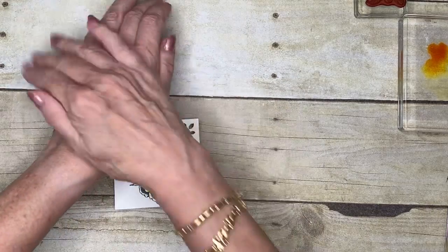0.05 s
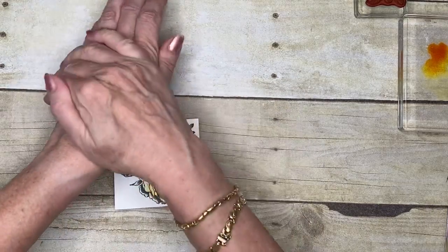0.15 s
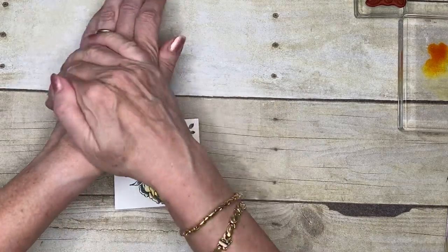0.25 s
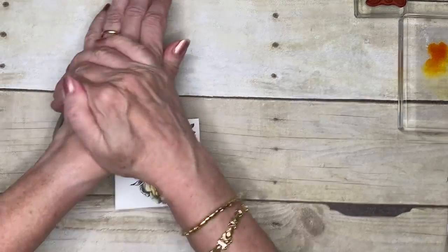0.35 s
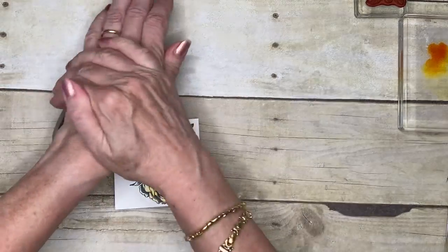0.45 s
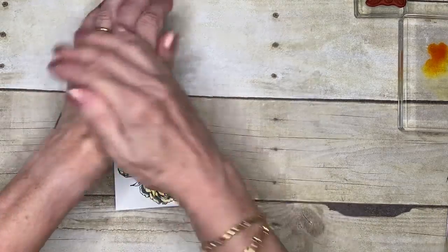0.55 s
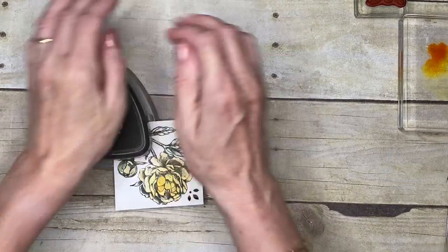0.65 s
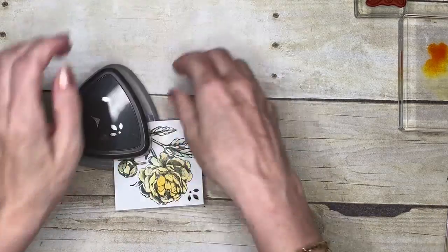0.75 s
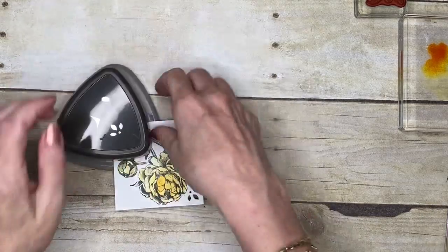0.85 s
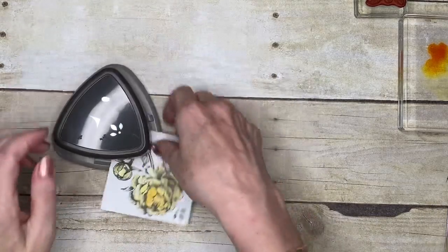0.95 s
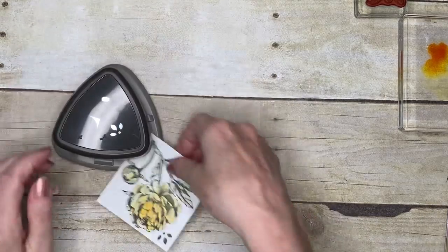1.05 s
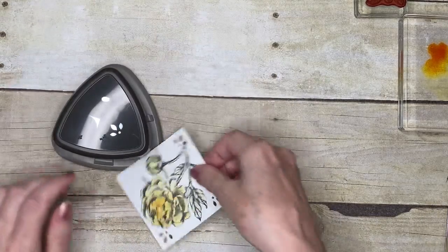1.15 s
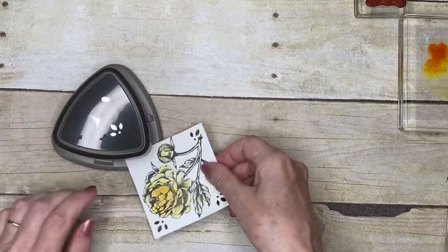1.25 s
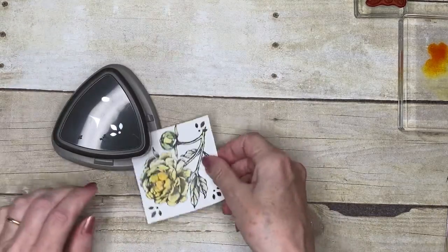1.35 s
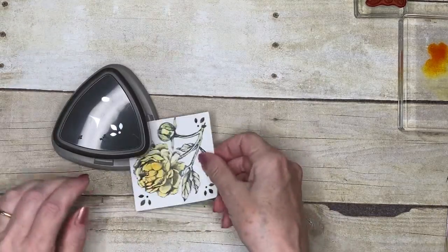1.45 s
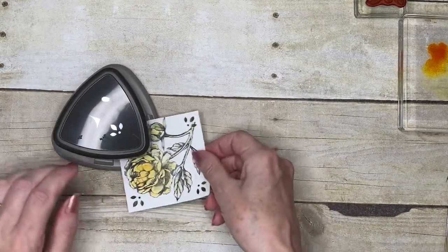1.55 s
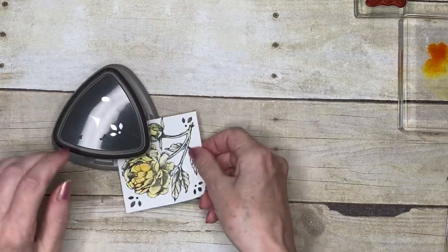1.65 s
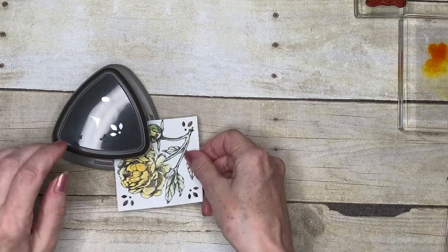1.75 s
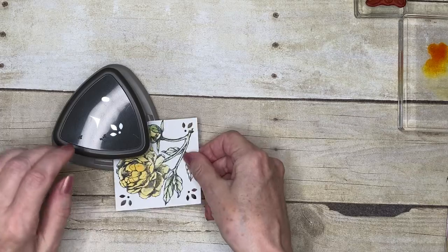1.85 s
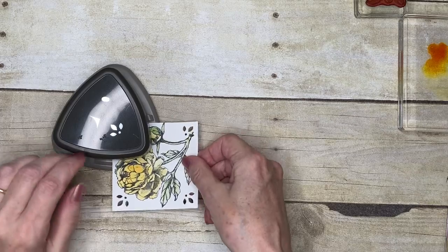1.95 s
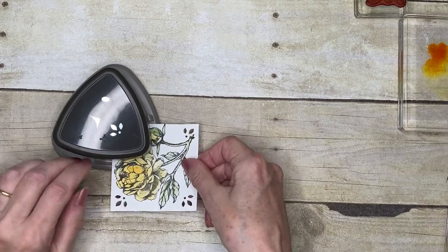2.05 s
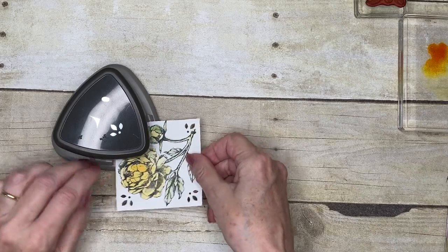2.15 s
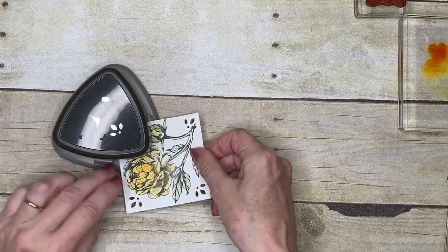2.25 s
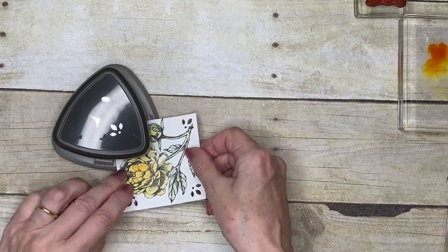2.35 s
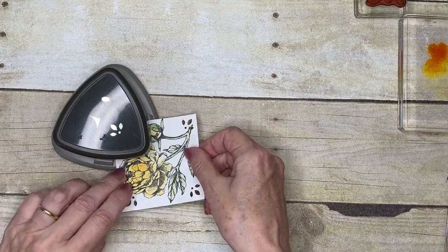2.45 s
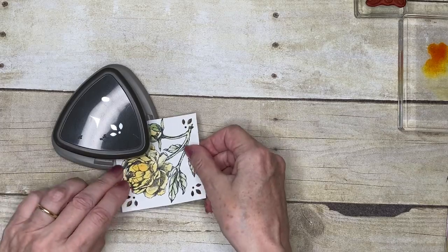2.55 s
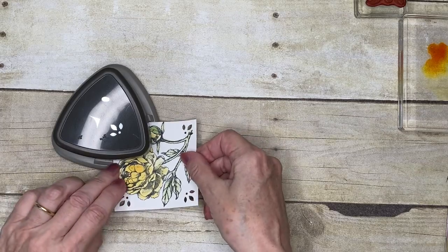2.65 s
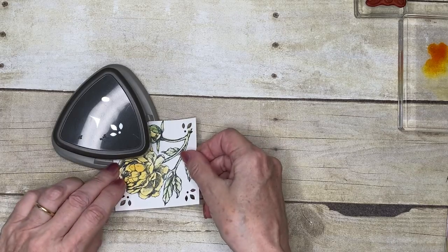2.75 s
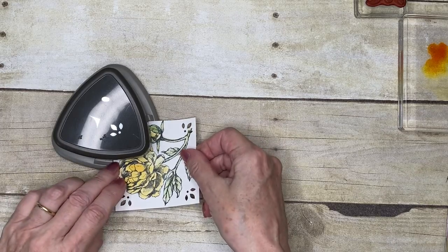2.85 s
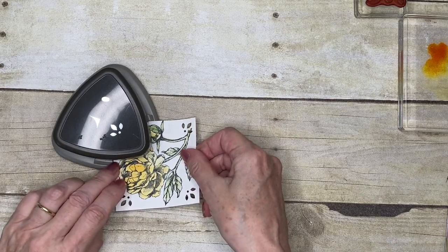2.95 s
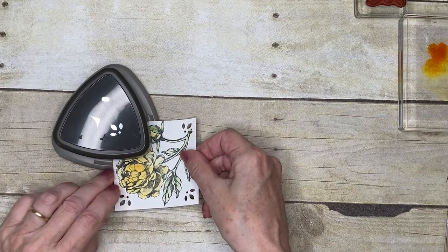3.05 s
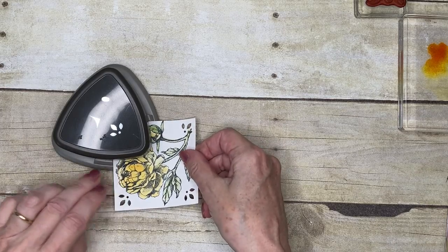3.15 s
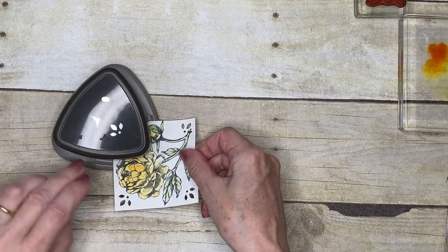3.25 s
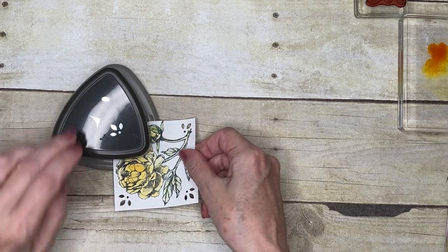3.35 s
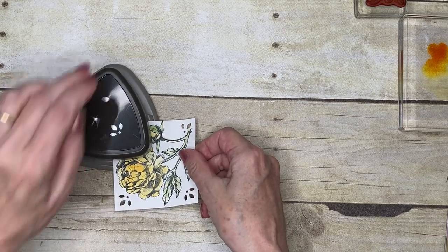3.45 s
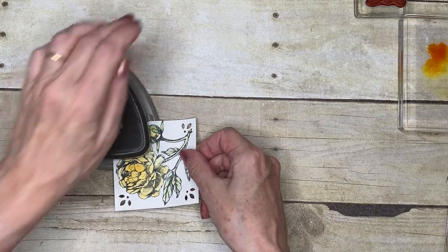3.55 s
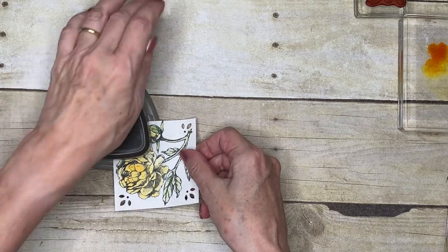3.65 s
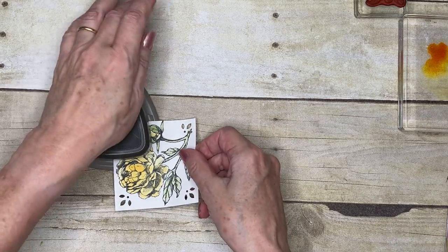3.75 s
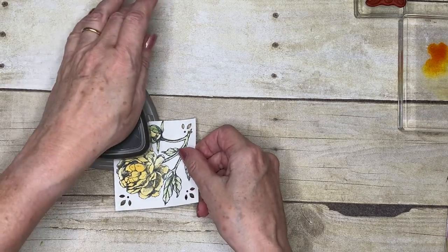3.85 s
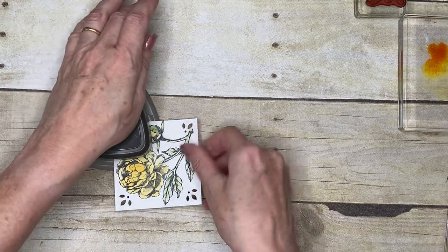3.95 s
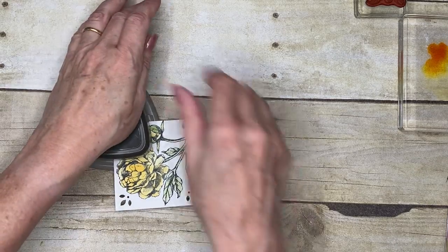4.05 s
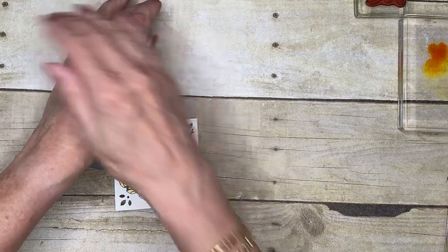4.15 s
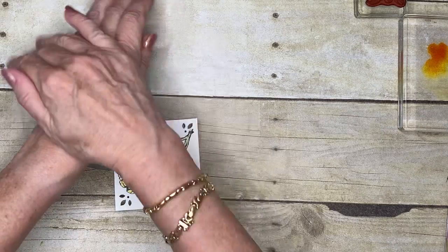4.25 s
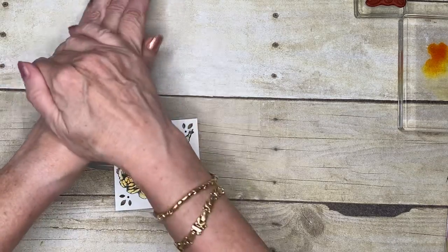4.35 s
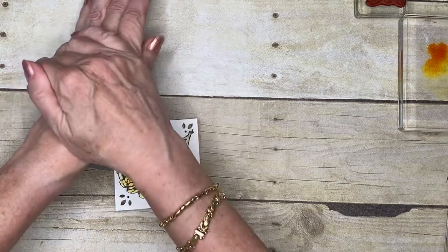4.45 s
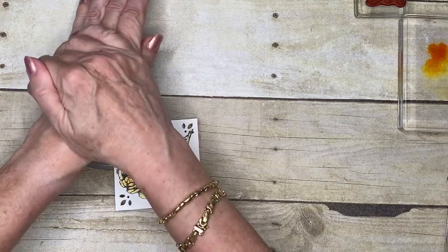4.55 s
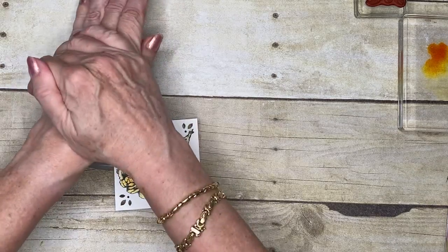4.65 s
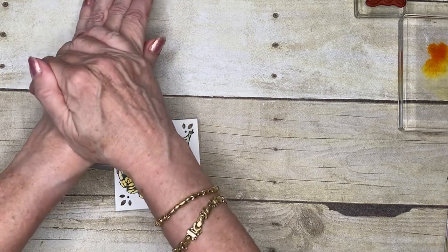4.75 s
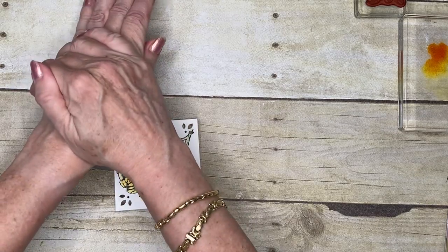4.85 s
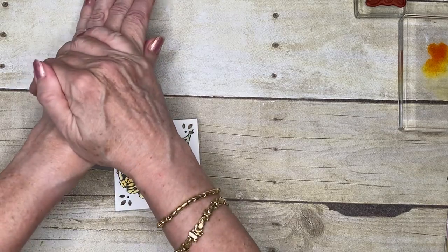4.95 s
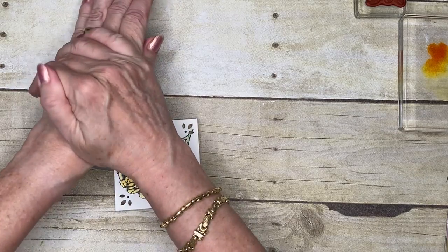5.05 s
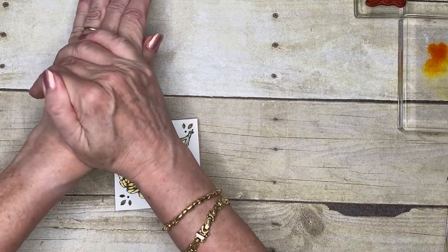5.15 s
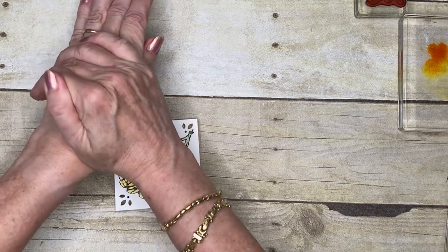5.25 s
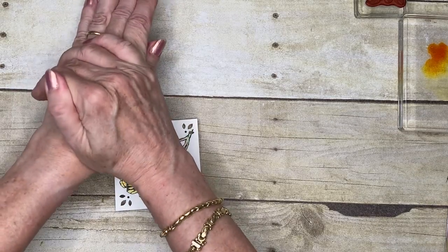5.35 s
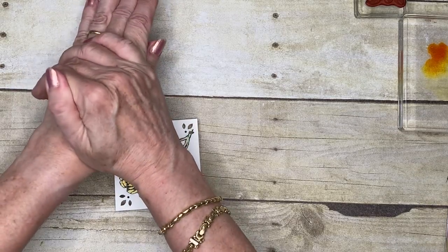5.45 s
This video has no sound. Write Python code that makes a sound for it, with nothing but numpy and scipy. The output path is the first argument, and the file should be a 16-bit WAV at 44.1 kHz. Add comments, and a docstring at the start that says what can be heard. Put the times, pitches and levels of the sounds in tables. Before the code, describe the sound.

A phone just above the table hears a hard, hollow plastic snap at the start, with a short wooden boom, then a scuff and softer springback click with a very faint metallic ring. Quiet papery shuffles and little taps follow, thinning to near silence over low room rumble. Late on, a dull hand touch and one medium plastic click, then faint rubbing; no second loud snap.

```python
"""On a wooden craft table in a small quiet room, a plastic corner punch cuts a card, heard by a phone above.
Palms lean on the lid until the die snaps through, the lid springs back, the card is slid out, turned and
nudged into the slot again, and a hand settles on the lid. Contacts ring damped modes of shell and slot lip,
pushes boom in the table top, two spring modes beat, and filtered friction noise makes the strokes.
Decaying noise tails form the room's answer, over a low building rumble with faint hiss."""
import sys
import numpy as np
from scipy import signal
from scipy.fft import rfft, irfft, next_fast_len
from scipy.io import wavfile
from scipy.ndimage import uniform_filter1d, map_coordinates

SR = 44100
rng = np.random.default_rng(int(sys.argv[2]) if len(sys.argv) > 2 else 0)


def master_out(mix):
    """Clip the mix to full scale and print it as 16-bit PCM to the path in sys.argv[1]."""
    frames = np.transpose(np.atleast_2d(mix))
    ceiling = np.clip(frames, -1, 1)
    pcm = np.round(ceiling * 32767).astype(np.int16)
    wavfile.write(sys.argv[1], SR, pcm)


N = 242550  # 5.5 s


# Contacts on the punch: start_s, shell_db, edge_re_shell_db, crack_re_shell_db (before fixed trims),
# favoured_shell_hz, favoured_edge_hz
CONTACTS = [(0.016, -55.5, -3, -11, 1370, 2000), (0.109, -34.5, -8, -11, 1400, 2730),
            (0.294, -23, -9, -18, 1500, 2560), (.2995, -3, -5.5, -16.5, 1538, 2770),
            (.302, -6, -12, -7, 1362, 2800), (.306, -5, -23, -3.5, 1150, 2090),
            (.309, -26, 8, -4, 757.8, 2100), (.54, -11, -12, -10.5, 920, 2230),
            (.5445, -15.5, -8, -9.5, 1030, 2220), (.55, -30.5, 7, -30, 1090, 3200),
            (0.732, -57.5, -11.5, -1.5, 910, 2350), (0.853, -35.5, -19.5, -10, 1400, 1895),
            (0.913, -31.5, -16.5, -25, 1040, 2180), (0.955, -49.5, 7.5, -2, 637, 2870),
            (1.027, -49.5, 13, -4, 1045, 2450), (1.145, -55, 5.5, 7, 1140, 2300),
            (1.191, -32.5, 7, -23, 1276, 2500), (1.244, -50, -10, -30.5, 933, 2280),
            (1.425, -59.5, 14, -14, 1590, 1860), (1.463, -48, 2.5, -18.5, 1144, 1910),
            (1.49, -41, 3.5, -35, 1228, 1820), (1.594, -50.5, -6.5, -27.5, 930, 2650),
            (1.737, -54.5, 7.5, -6.5, 1060, 2654), (1.893, -40, 0, -5, 1230, 2500),
            (2.171, -49, 9.5, -3.5, 1063, 2940), (2.301, -39, -0.5, -40, 1260, 2500),
            (2.635, -30, -0.5, -6, 1224, 2670), (2.762, -49, 10.5, -29, 1000, 2316),
            (3.368, -47, -17, -35, 618, 3140), (3.681, -61, -8.5, -16.5, 688, 2630),
            (3.739, -56.5, -16, -20, 655, 2240), (3.796, -46, 4, -11.5, 1196, 2300),
            (3.839, -28.5, -20.5, -17, 690, 2690), (3.946, -41.5, 0.5, -15.5, 1530, 2770),
            (4.222, -62.5, 0, -17, 1500, 2000), (4.243, -49, -21, -35.5, 694, 1900),
            (4.3015, -15.5, -13.5, -13, 1110, 1760), (4.487, -65.5, -8.5, 8, 552, 2777),
            (4.755, -52, -1, 12, 972, 2300), (4.9, -52, -1.5, -17.5, 1530, 1707)]
# Modes of the plastic shell, before random detuning and spread: pitch_hz, level_db, t60_s
SHELL_MODES = [(543, -4, 0.029), (760, 0.5, 0.021), (890, -1, 0.019), (1021, 1.5, 0.01), (1146, 4, 0.02),
               (1234, -1, .025), (1304, -1, 0.019), (1508, -0.5, .022), (1630, -10.5, 0.025)]
# Modes of the thin lip of the slot, likewise: pitch_hz, level_db, t60_s
EDGE_MODES = [(1880, -1, .018), (2050, -2, .018), (2280, 0, .018), (2550, 0, .016), (2810, 0, .014),
              (3200, -2, .012), (4000, -5, .01), (5000, -6, .008)]
# Relative spectrum of the crack: frequency_hz, density_db (per Hz)
CRACK_SPECTRUM = [(300, -2), (1000, -1.5), (3000, 0.5), (5500, -2), (8000, -0.5), (11000, 2), (15000, -7.5)]


def clicks():
    """Modal excitation: a contact rings shell and lip, most near its spot's favoured pitches, with a brief crack."""
    out, t = np.zeros(N), np.arange(SR // 16) / SR
    noise = rng.standard_normal((len(CONTACTS), len(t)))
    cracks = unit(filtered(noise, lambda hz: amp(along(CRACK_SPECTRUM, hz))))
    cracks *= amp(-60 * t / 0.019) * (1 - np.exp(-t / 0.0022))
    for (s, db, edge_db, crack_db, shell_hz, edge_hz), crack in zip(CONTACTS, cracks):
        # level falls by so many dB per octave away from the favoured pitch
        modes = [(hz, level + 0.5 - 10.5 * abs(np.log2(hz / shell_hz)), t60)
                 for hz, level, t60 in SHELL_MODES]
        modes += [(hz, level + edge_db + 2.5 - 15 * abs(np.log2(hz / edge_hz)), t60)
                  for hz, level, t60 in EDGE_MODES]
        body = np.zeros(len(t))
        for hz, level, t60 in modes:
            detune, spread = rng.standard_normal(2)
            body += ring(hz * (1 + 0.03 * detune), level + 2.9 * spread, t60, t, attack=.0017)
        add(out, s, amp(db) * (body + amp(crack_db + 4.5) * crack))
    return out


# Pushes into the table top: start_s, first_mode_db, second_mode_db, third_mode_db, planks_db
TABLE_PUSHES = [(0.069, -32.5, -36, -58, -50), (0.115, -42, -36, -32, -39), (0.3081, -10.5, 0, -9.5, -5),
                (.518, -34, -37, -17, -26.5), (0.549, -30.5, -21.5, -41.5, -27.5),
                (.86, -64.5, -68.5, -45.5, -54), (.915, -50.5, -75.5, -46.5, -48),
                (1.247, -49.5, -75, -62.5, -51), (3.801, -56.5, -37, -36, -42),
                (3.843, -30.5, -23.5, -23, -35.5), (3.94, -39.5, -49, -54, -49),
                (4.266, -36.5, -54, -50, -57), (4.307, -35, -25, -20, -26), (4.796, -57.5, -51, -43.5, -35)]
# Lowest modes of the table top: pitch_hz, t60_s
TABLE_MODES = [(57, 0.39), (124, 0.062), (173, 0.095)]
# Higher modes of the table top: pitch_hz, level_db, t60_s
PLANK_MODES = [(203, -5, 0.045), (289, -13, 0.11), (350.7, -15, 0.091), (413, -17, .06), (540, -5.5, 0.023)]
# Relative spectrum of the loose planks' shudder: frequency_hz, density_db (per Hz)
SHUDDER_SPECTRUM = [(60, -32.5), (150, -3.5), (250, 3), (500, -3.5), (900, -13), (2000, -33)]


def table():
    """Plate modes: each push starts the low boom, the higher modes and a noisy shudder, all decaying freely."""
    out, t = np.zeros(N), np.arange(SR // 2) / SR
    noise = rng.standard_normal((len(TABLE_PUSHES), len(t)))
    shudders = unit(filtered(noise, lambda hz: amp(along(SHUDDER_SPECTRUM, hz))))
    shudders *= amp(-10.5 - 60 * t / 0.099) * (1 - np.exp(-t / 0.0027))
    for (s, *levels, planks_db), shudder in zip(TABLE_PUSHES, shudders):
        boom = sum(ring(hz, db, t60, t, attack=0.0032) for (hz, t60), db in zip(TABLE_MODES, levels))
        planks = sum(ring(hz, db, t60, t, attack=0.00067) for hz, db, t60 in PLANK_MODES)
        add(out, s, boom + amp(planks_db) * (planks + shudder))
    return out


# Strokes of card and skin: start_s, length_s, card_db, shell_db, skin_hiss_db (before brightness and favour),
# swell_db (start to end), brightness_db (per octave), favoured_hz
RUBS = [(0.024, 0.037, -78, -68, -93, -1.5, -4, 700), (0.056, 0.054, -72, -68, -69.5, -1, 7, 1200),
        (0.13, 0.037, -82, -83, -78, -7, .1, 1300), (0.181, 0.0091, -79, -82, -66, 0, -1, 1200),
        (0.222, 0.053, -81.5, -90.5, -81, 3, -1, 1600), (0.271, 0.038, -66.5, -51.5, -80, 2, 24.5, 1500),
        (0.489, 0.073, -49.5, -47, -56.5, 9, 6.5, 750), (0.725, 0.039, -78.5, -68, -67, -10, 1.5, 1000),
        (0.851, 0.056, -66, -56.5, -64, -4, 8, 1350), (0.916, 0.03, -62.5, -54.5, -66.5, -8.5, 1, 1010),
        (0.945, 0.089, -70, -70.5, -66, 4.5, 7.5, 2910), (1.03, 0.12, -62, -67, -65.5, -1.5, -2.5, 2400),
        (1.14, 0.062, -71.5, -71, -66.5, 4, -2, 2585), (1.194, .022, -60.5, -75, -69, -14, 2, 2500),
        (1.222, 0.048, -71, -64, -73.5, -11, -0.5, 2060), (1.291, .11, -69, -76, -68, -0.5, 0, 1950),
        (1.393, .088, -64, -71, -70.5, 2, -4, 1900), (1.486, 0.061, -76.5, -68, -77.5, -5.5, 3, 996),
        (1.546, 0.09, -71, -67, -74.5, 0, 2, 2740), (1.637, 0.1, -70, -72, -81, 1, 4, 2900),
        (1.739, 0.042, -66, -67.5, -66, -7, 1, 2595), (2, .1, -86.5, -82, -91.5, 1.5, 3, 1550),
        (2.114, .035, -83, -75.5, -79.5, -5, 1, 1300), (2.156, 0.056, -72, -69, -79.5, -6.5, 0.8, 1009),
        (2.213, 0.086, -79, -79, -92.5, -2, .1, 2800), (2.315, .09, -79, -74, -92, -7, 0.2, 2800),
        (2.484, 0.061, -70, -80, -82.5, 0.5, 1, 2900), (2.58, 0.055, -66.5, -67.5, -72.5, 8.5, -1, 2005),
        (2.65, 0.044, -78, -68, -76, -14, 0.2, 1197), (2.763, 0.045, -72.5, -89.5, -92.5, -15.5, 3.1, 2705),
        (2.988, .04, -82, -78.5, -86, 1, 0.5, 1503), (3.663, 0.044, -70, -70.5, -79, -4.5, 6, 750),
        (3.757, 0.048, -72, -60, -79, 4, -6, 795), (3.803, 0.03, -59.5, -56, -65, 6.5, 4, 3010),
        (3.868, .025, -79, -84, -82.5, -7, -2, 3000), (3.903, 0.036, -67, -69.5, -70, 3, 2.5, 1980),
        (3.944, 0.053, -57, -60, -58, -3.5, 2, 1600), (4.258, 0.047, -83.5, -67.5, -79.5, 10, 9, 1507),
        (4.396, 0.082, -75, -71.5, -86, -5.5, 3.5, 3600), (4.494, 0.094, -83.5, -80.5, -88.5, 0, 5, 2000),
        (4.587, 0.17, -73.5, -71, -83, 0.5, 3.5, 3613), (4.759, 0.083, -62, -64, -63.5, -11.5, 6, 1100),
        (4.831, 0.06, -68.5, -70, -66.5, -6.5, 6.5, 3130),
        (5.125, .04, -88.5, -90.5, -80.5, 0.5, 0.7, 2000), (5.17, .03, -94.5, -76.5, -93, -4, -2.5, 700),
        (5.36, 0.094, -76, -76, -90.5, 2, -0.2, 2100)]
# Resonances of the card, passed twice: centre_hz, width_hz, level_db (each pass)
CARD_RESONANCES = [(1881, 400, -2.5), (2650, 600, 0), (3200, 690, -1.5), (4500, 1500, -7)]
# Resonances of the air under the lid, passed twice: centre_hz, width_hz, level_db (each pass)
HOLLOW_RESONANCES = [(624, 530, -5.5), (993, 232.6, 0.5), (1297, 130, 3), (1377, 470, -2)]
# Relative spectrum of the skin's hiss: frequency_hz, density_db (per Hz)
HISS_SPECTRUM = [(1500, -29), (3500, -11), (5500, -9), (8000, 1), (11000, -0.5), (15000, -13.5)]
# Pivots about which brightness tips card, shell and skin hiss: centre_hz
PIVOTS_HZ = [2500, 1100, 8000]
GRIP_S, EASE_IN, LET_GO_S = .008, .4, .02  # shortest rise; rise over length if it swells; time to die by 20 dB
FAVOUR_DB, FAVOUR_OCTAVES = 6.5, .15  # lift and width of the band that a stroke's spot favours


def sliding():
    """Stick-slip friction: uneven noise with clumps of tiny catches excites card, hollow lid and skin."""
    out, t = np.zeros(N), np.arange(SR // 3) / SR
    catches = (rng.random((3, N)) < 900 / SR) * amp(4 * rng.standard_normal((3, N)))  # about 900 a second
    own_grip = np.array([wobble(70) for _ in range(3)])
    grip = amp(2.1 * wobble(45) + 4.0 * own_grip)  # shared and separate unevenness of the contact
    friction = grip * rng.standard_normal((3, N)) * (1 + 0.3 * unit(catches))
    colours = [resonances(CARD_RESONANCES), resonances(HOLLOW_RESONANCES),
               lambda hz: amp(along(HISS_SPECTRUM, hz))]
    layers = np.array([unit(filtered(x, colour)) for x, colour in zip(friction, colours)])

    def octaves(hz):
        return np.clip(np.log2((hz + 1) / np.c_[PIVOTS_HZ]), -1, 1)

    for s, length, *levels, swell_db, bright_db, spot_hz in RUBS:
        rise = max(GRIP_S, EASE_IN * length * (swell_db > 0))
        swell = swell_db * (np.minimum(t / length, 1) - .5)
        release = -20 * np.maximum(t - length, 0) / LET_GO_S
        shape = np.minimum(t / rise, 1) * amp(swell + release)

        def tint(hz):
            distance = np.log2((hz + 1) / spot_hz) / FAVOUR_OCTAVES
            return amp(bright_db * octaves(hz) + FAVOUR_DB * np.exp(-distance ** 2))

        piece = layers[:, round(s * SR):][:, :len(t)]
        rub = amp(levels) @ filtered(piece, tint)
        add(out, s, rub * shape[:len(rub)])
    return out


# Modes of the return spring: pitch_hz, level_db, t60_s
SPRING_MODES = [(935, -59, 1.3), (1007, -57.5, 1.3)]
# Spring set free, then stopped by a finger: free_s, stopped_s
SPRING_SPAN = (.575, .853)


def spring():
    """Beating: two close spring modes interfere until a finger stops them."""
    free_s, stopped_s = SPRING_SPAN
    out, t = np.zeros(N), np.arange(round((stopped_s - free_s) * SR)) / SR
    add(out, free_s, sum(ring(hz, db, t60, t, attack=.03) for hz, db, t60 in SPRING_MODES))
    return out


# Reverberation of the room: frequency_hz, t60_s
ROOM_DECAY = [(100, 0.46), (500, .3), (1200, 0.29), (4000, 0.36), (14000, .25)]


def room(x, piece_s=0.19):
    """Reverberation: each frequency decays at its own rate; every stretch of sound gets a new noise tail."""
    out, step = np.zeros((2, N + 2 * SR)), round(piece_s * SR)
    length, starts = SR // 3, range(0, N, step)
    noise = diffuse(length * len(starts)).reshape(2, len(starts), length)
    hz, t, z = signal.stft(noise, SR, nperseg=256)
    decay = amp(-60 * t / along(ROOM_DECAY, hz)[:, None])
    tails = signal.istft(z * decay, SR, nperseg=256)[1]
    delay = 300  # samples before the room answers
    for k, start in enumerate(starts):
        tail = tails[:, k] / np.linalg.norm(tails[0, k])
        wet = signal.fftconvolve(x[None, start:start + step], tail, axes=1)
        out[:, start + delay:start + delay + wet.shape[1]] += wet
    return out[:, :N]


# Relative spectrum of the room tone: frequency_hz, density_db (per Hz)
AIR_SPECTRUM = [(12, -64.5), (20, -28.5), (45, -8), (86, -8), (168, -16), (241, -30), (422, -33.5),
                (527, -30), (698, -44), (1150, -38.5), (1260, -47), (1400, -39.5), (2200, -48.5),
                (13900, -55), (16000, -66.5)]
AIR_DB = -60.5  # rms of the room tone


def air():
    """Stationary noise: building rumble and faint hiss, made gently patchy in time and frequency."""
    z = signal.stft(diffuse(N), nperseg=1024)[2]
    patches = uniform_filter1d(rng.standard_normal(z.shape[1:]), 6, 0)
    patches = unit(uniform_filter1d(patches, 6, 1))
    noise = signal.istft(z * amp(0.78 * patches), nperseg=1024)[1][:, :N]
    return amp(AIR_DB) * unit(filtered(noise, lambda hz: amp(along(AIR_SPECTRUM, hz))))


# Likeness of the two channels in diffuse sound: frequency_hz, correlation (no unit)
LIKENESS = [(60, 0.97), (350, 0.77), (1000, 0.043), (2500, 0.085), (5000, 0.33), (6500, 0.27), (8000, 0.94),
            (15000, .9)]


def diffuse(length):
    """Partial coherence: mid and side noise mix to white stereo with the set likeness at each frequency."""
    def turn(hz):
        return np.arccos(np.clip(along(LIKENESS, hz), -1, 1)) / 2

    noise = rng.standard_normal((2, length))
    mid, side = filtered(noise, lambda hz: np.array([np.cos(turn(hz)), np.sin(turn(hz))]))
    return np.array([mid + side, mid - side])


def amp(db):
    """Decibel law: level to amplitude ratio."""
    return 10 ** (np.asarray(db) / 20)


def unit(x):
    """Normalisation to an rms of one."""
    return x / np.sqrt(np.mean(x ** 2) + 1e-20)


def along(points, hz):
    """Interpolation of (Hz, value) points on a logarithmic frequency axis."""
    f, v = np.transpose(points)
    return np.interp(np.log(hz + 1), np.log(f + 1), v)


def filtered(x, response):
    """Linear filtering: the spectrum of x times a complex response of frequency."""
    m = next_fast_len(x.shape[-1] + 8192)
    return irfft(rfft(x, m) * response(np.fft.rfftfreq(m, 1 / SR)), m)[..., :x.shape[-1]]


def resonances(modes):
    """Resonators in parallel: causal bands of alternating sign, passed twice for deep valleys."""
    def response(f):
        total = 0
        for k, (c, w, db) in enumerate(modes):
            total = total + (-1) ** k * amp(db) * 1j * f * w / (c * c - f * f + 1j * f * w)
        return total ** 2
    return response


def ring(hz, db, t60, t, attack):
    """Damped oscillation: a sine dying by 60 dB in t60 s, with a soft attack in s."""
    return amp(db - 60 * t / t60) * np.sin(2 * np.pi * hz * t) * (1 - np.exp(-t / attack))


def wobble(rate):
    """Slow random modulation: a smooth curve with rate knots a second."""
    knots = rng.standard_normal(int(N * rate / SR) + 4)
    return map_coordinates(knots, [np.arange(N) * rate / SR])


def add(track, s, sound):
    """Superposition: mix a sound in at s seconds."""
    part = track[round(s * SR):][:len(sound)]
    part += sound[:len(part)]


# Level sent into the room: frequency_hz, level_db
ROOM_SEND = [(100, -14), (400, -8.5), (900, -8.5), (1350, -13), (2200, -8.5), (4000, -10), (8000, -14),
             (14000, -14)]


def scene():
    """Superposition of direct sound, the room's answer and room tone."""
    near = clicks() + table() + sliding() + spring()
    return near + room(filtered(near, lambda hz: amp(along(ROOM_SEND, hz)))) + air()


# Balance of the channels: frequency_hz, left_over_right_db
BALANCE = [(60, 2.5), (200, 1), (4000, -1), (8000, 0)]
# Phase between the channels: frequency_hz, left_lead_rad
PHASE_LEAD = [(0, 0), (2000, -.3), (3500, -.9), (5300, -1.7), (6200, -3.14), (16000, 14.7)]
TOP_HZ = 16050  # band limit


def record(dry, low_hz=45):
    """Transduction: the phone sets balance and phase, cuts deep bass, rounds loud peaks and limits the band."""
    def half(hz):  # half the difference goes to each channel
        return amp(along(BALANCE, hz) / 2) * np.exp(.5j * np.interp(hz, *np.transpose(PHASE_LEAD)))

    def low_cut(hz):
        return hz * hz / (hz * hz - low_hz * low_hz - 1.3j * hz * low_hz)

    x = filtered(dry, lambda hz: np.array([half(hz), 1 / half(hz)]) * low_cut(hz))
    x = x / (1 + np.abs(x / .89) ** 6) ** (1 / 6)  # peaks stay below .89
    return filtered(x, lambda hz: np.clip((TOP_HZ - hz) / 400, 0, 1) ** 2)


dry = scene()
out = record(dry)
master_out(out)
```